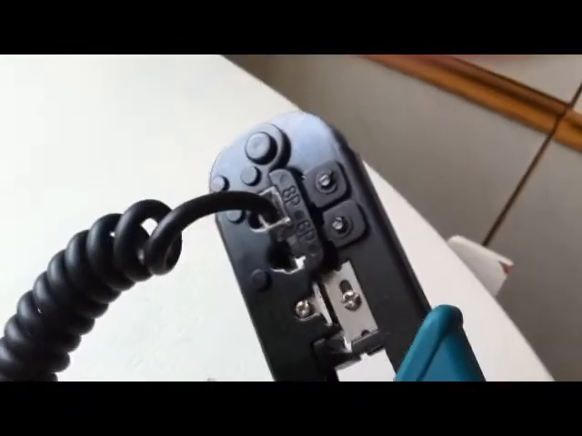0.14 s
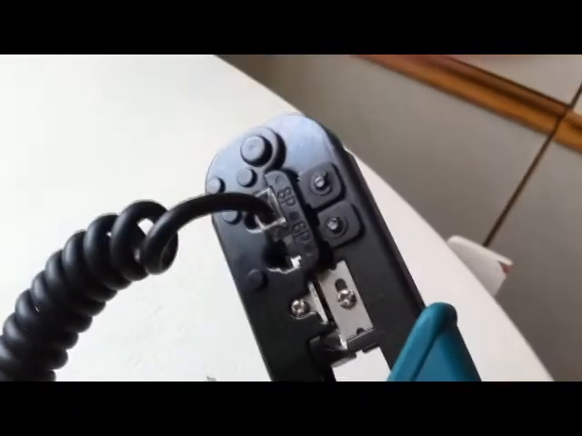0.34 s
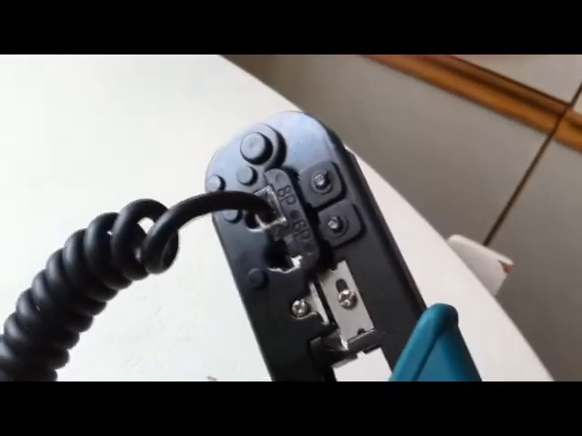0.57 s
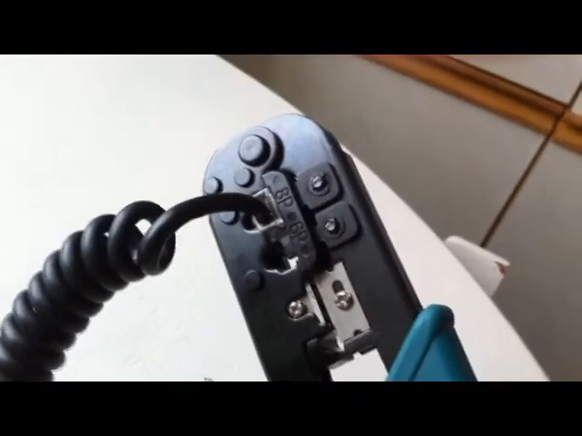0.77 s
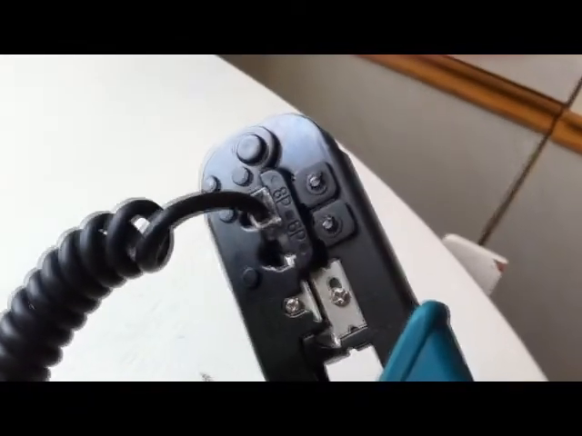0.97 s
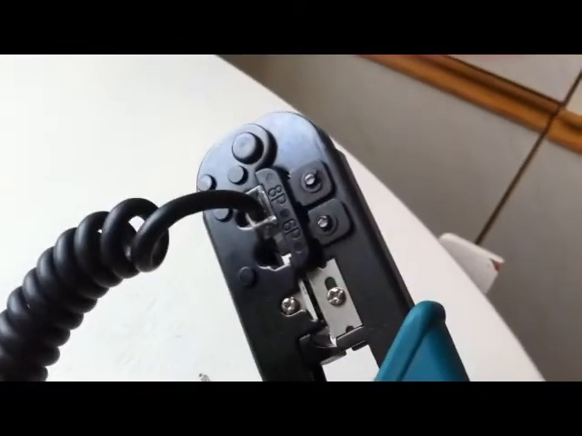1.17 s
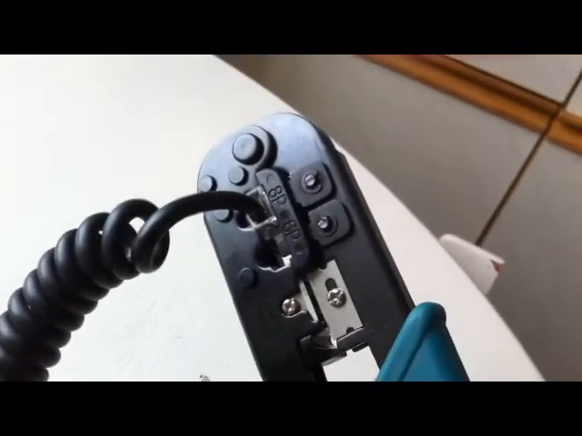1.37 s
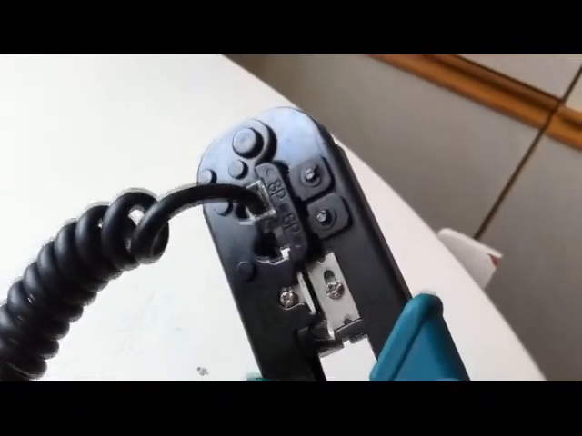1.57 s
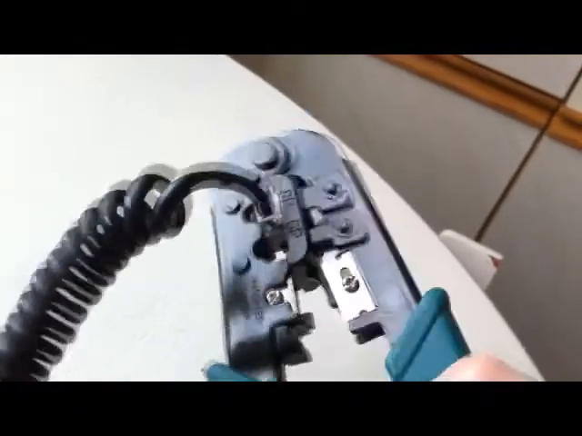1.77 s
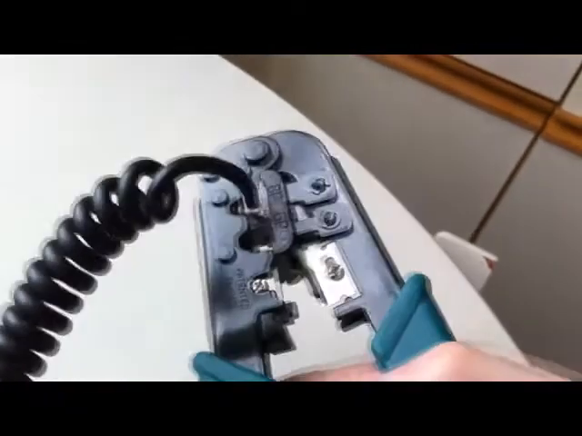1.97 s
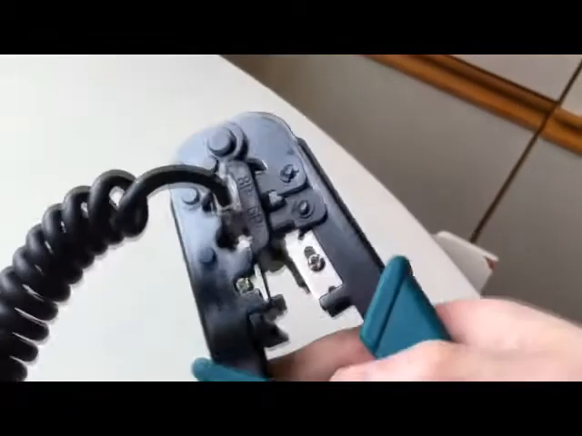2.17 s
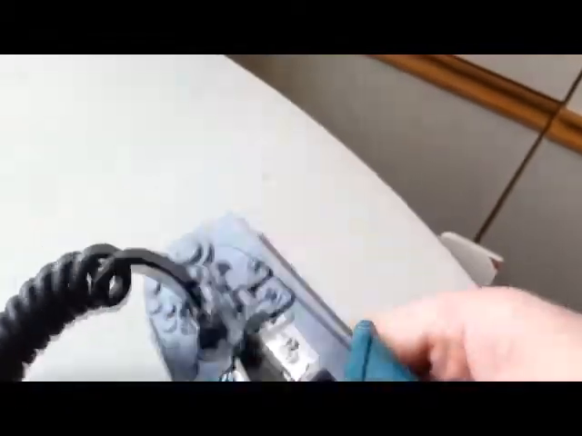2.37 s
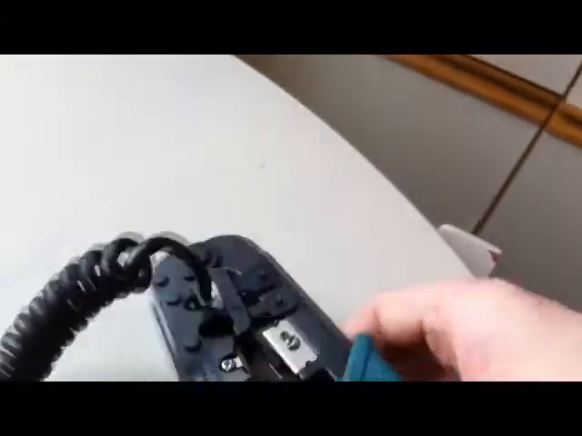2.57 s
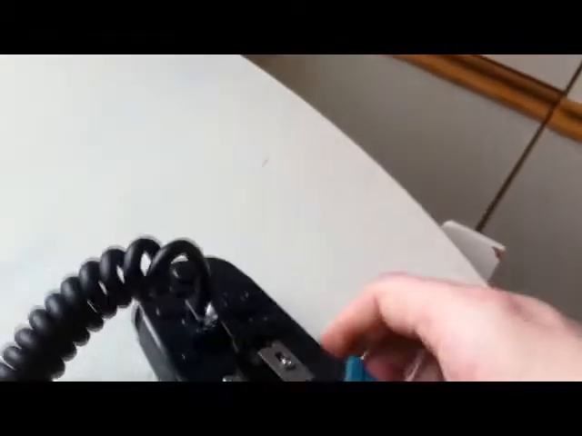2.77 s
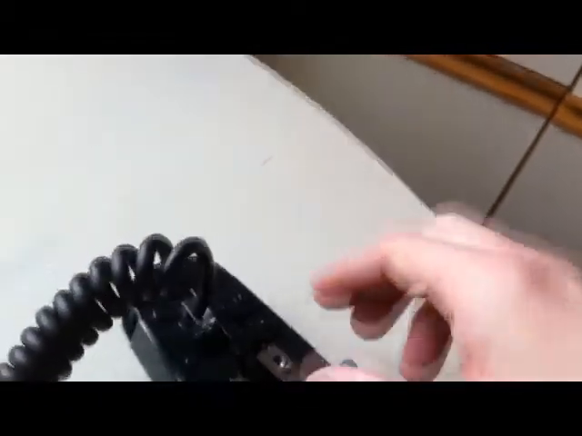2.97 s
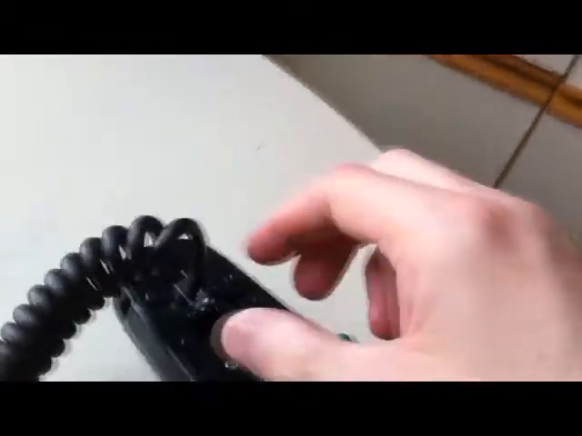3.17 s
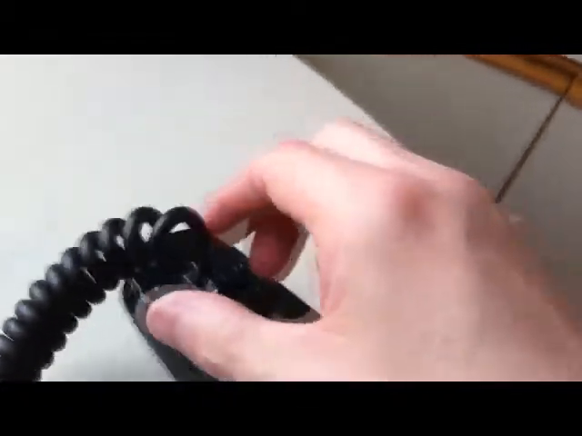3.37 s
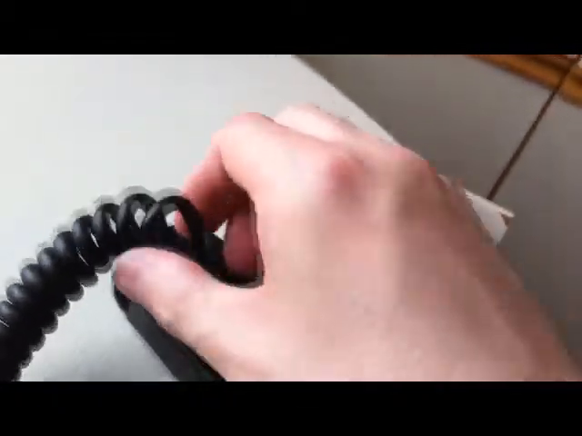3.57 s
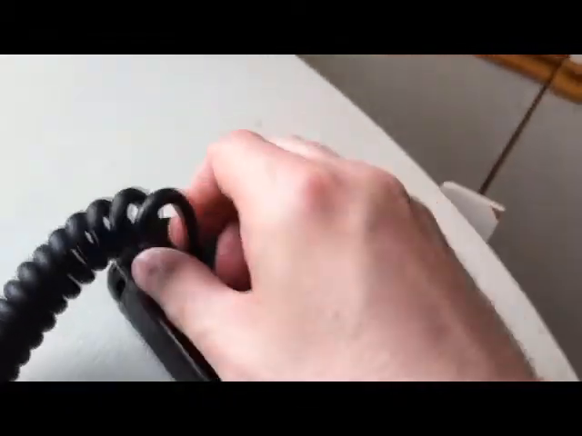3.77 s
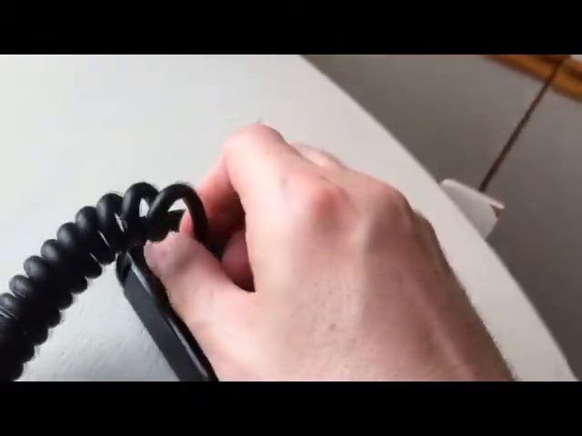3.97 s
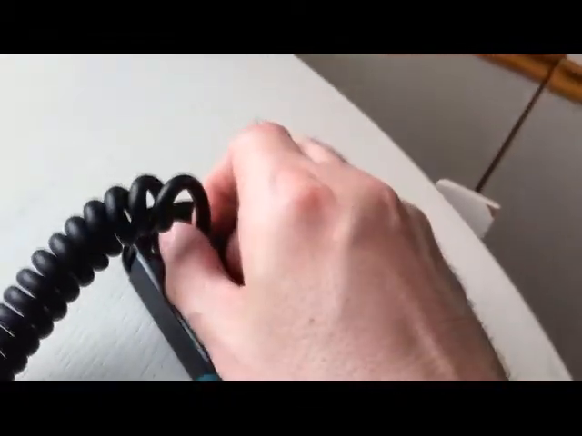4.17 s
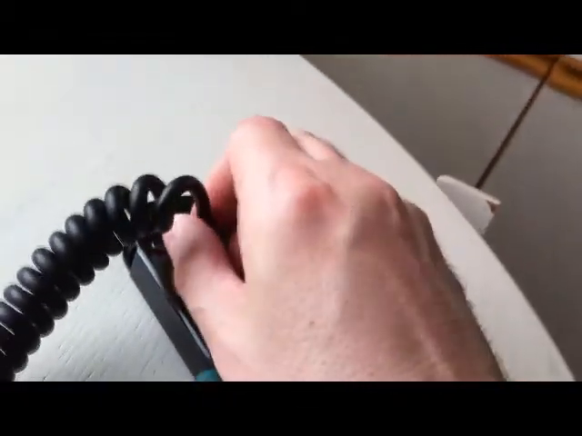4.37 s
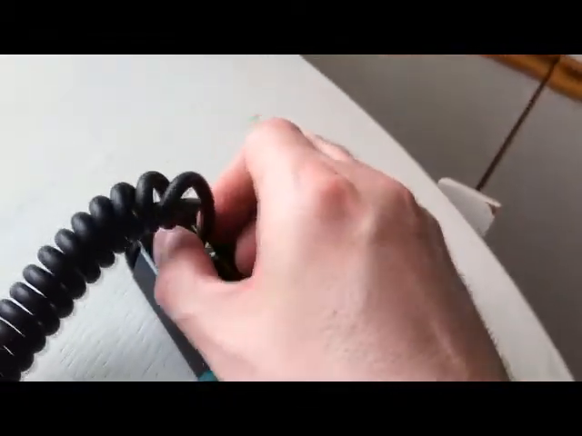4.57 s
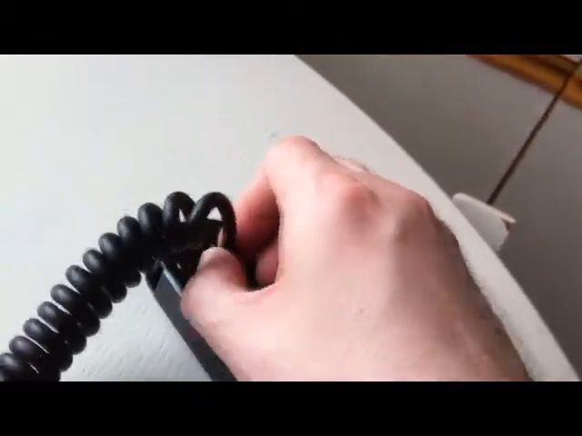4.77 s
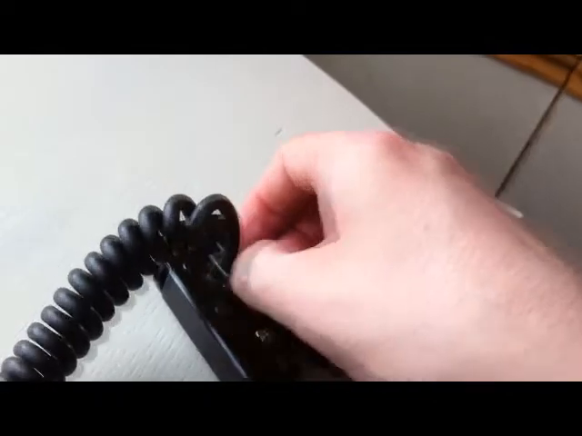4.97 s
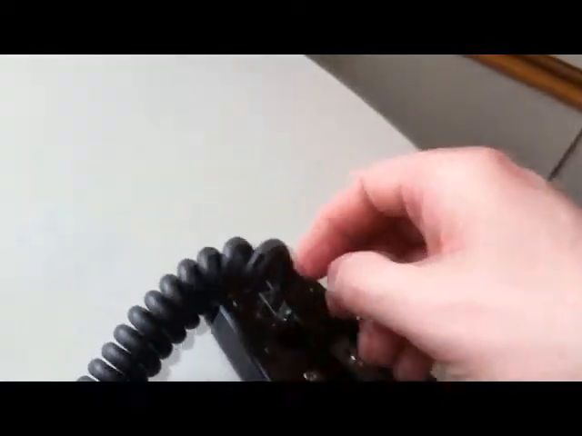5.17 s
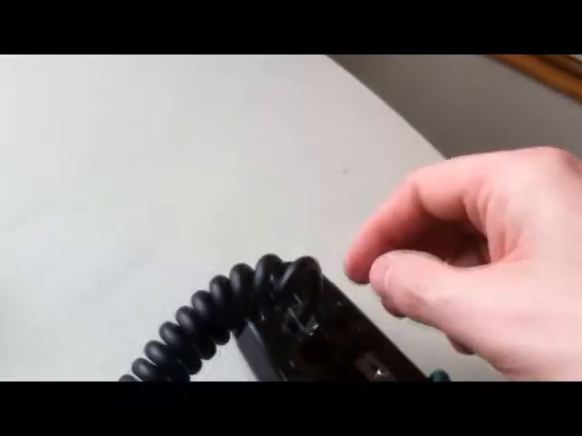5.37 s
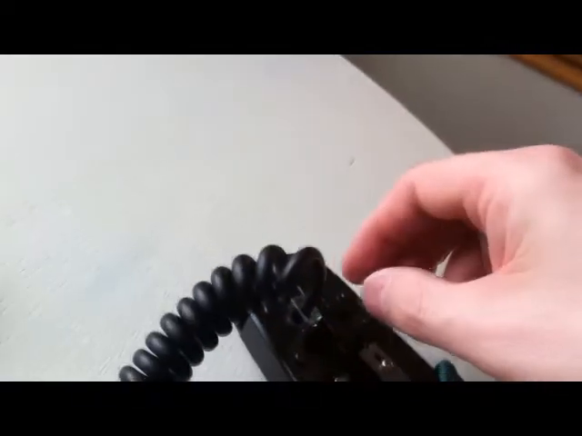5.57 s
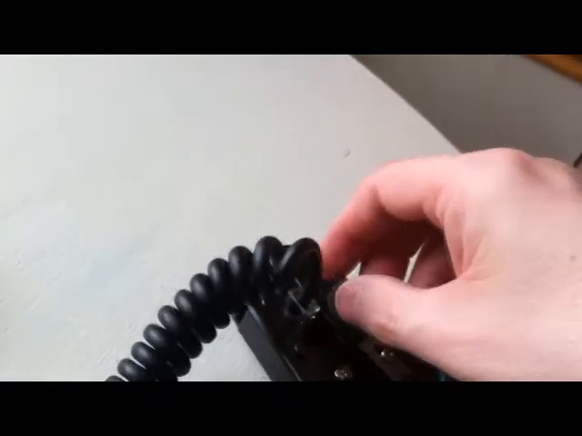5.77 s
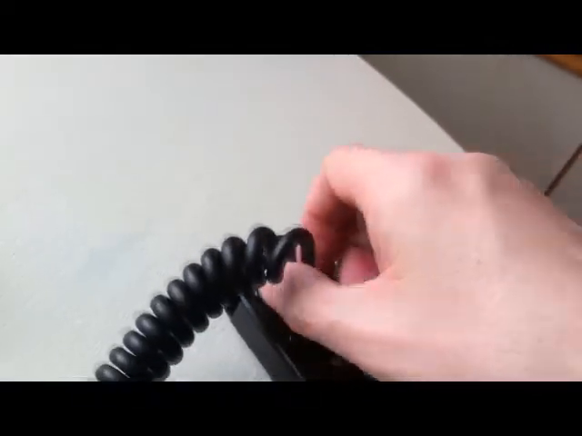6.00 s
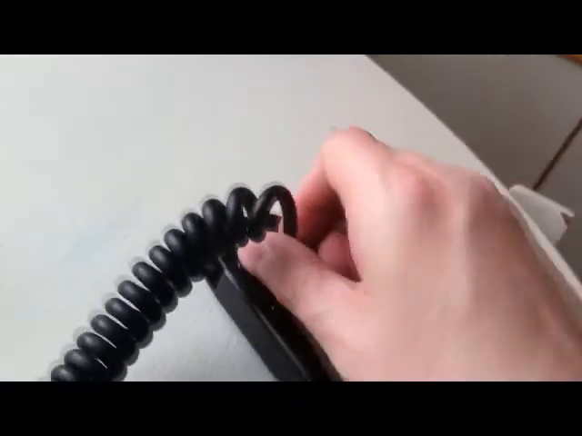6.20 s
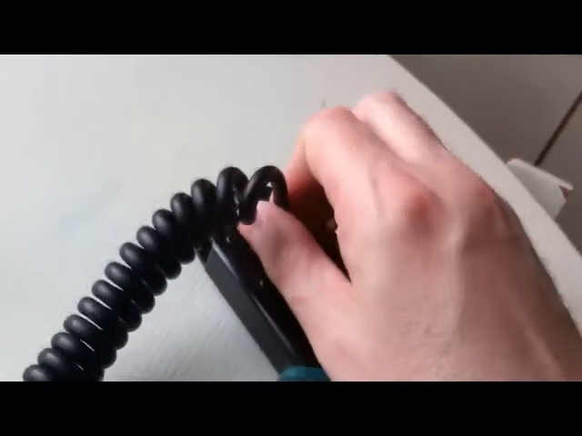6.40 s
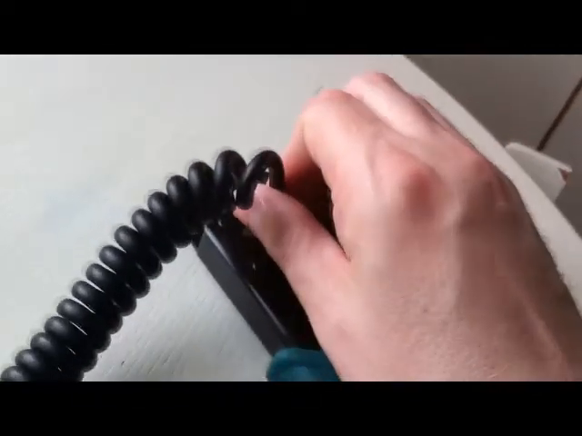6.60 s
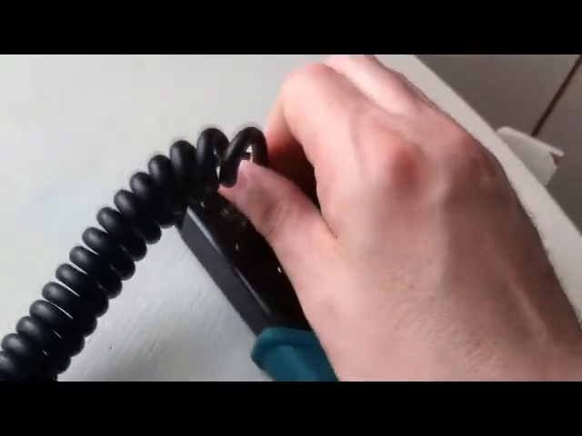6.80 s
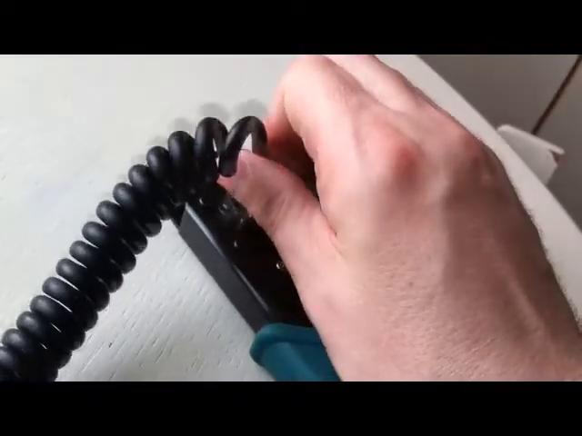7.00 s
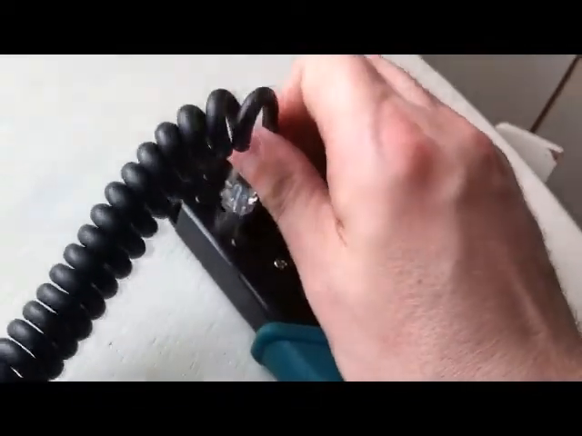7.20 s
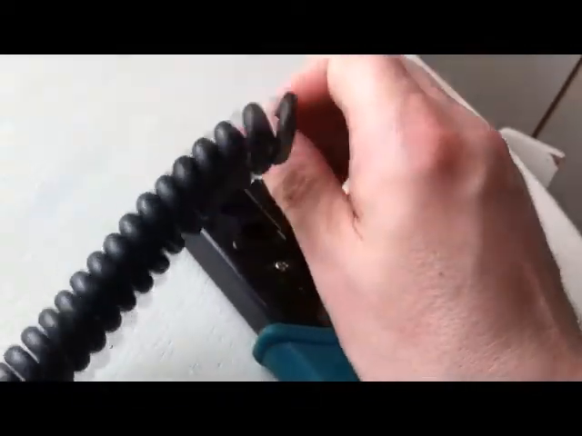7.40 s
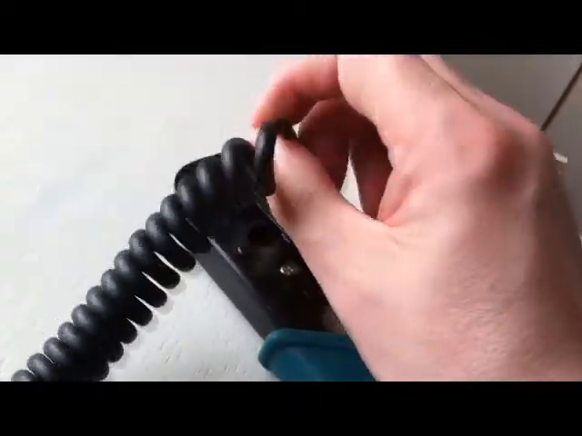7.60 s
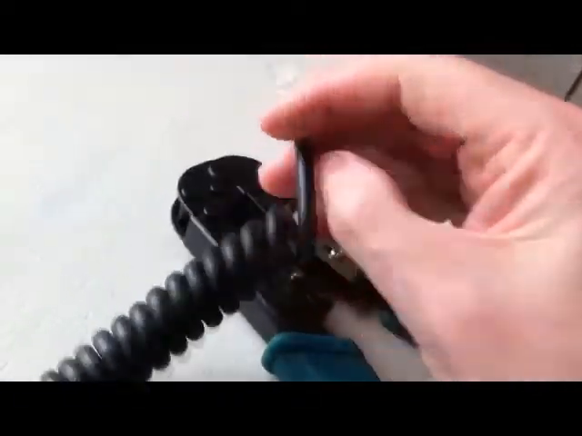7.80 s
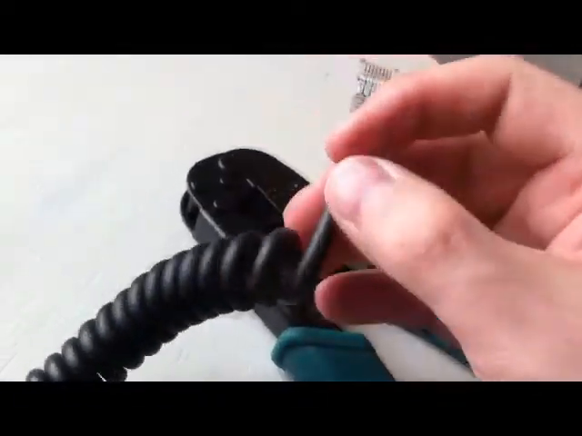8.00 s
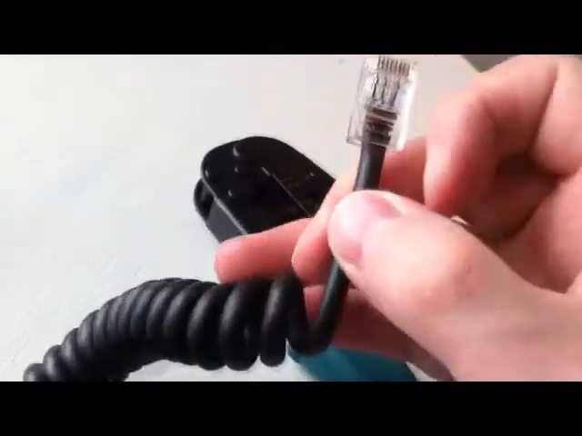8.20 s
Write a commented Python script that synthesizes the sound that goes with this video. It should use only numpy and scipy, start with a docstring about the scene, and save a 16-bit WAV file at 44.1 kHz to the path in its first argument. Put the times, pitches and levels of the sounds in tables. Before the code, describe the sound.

Quiet hissy room, then sharp clacks and hollow wooden thuds of a small steel tool set on a table, with faint rubbing and fiddling clicks.

```python
"""Low household rumble and microphone hiss run throughout. A steel crimping tool with plastic grips is
let go with faint ticks, laid on a hollow table top with hard knocks, and a plug is worked out of its jaw.
Each knock rings resonators for boards and tool frame and adds two short bursts of band noise, the crack.
Grips and fingers rub and the tool shuffles, as shaped noise; a small hard room answers with decaying noise."""
import sys
import numpy as np
from scipy import signal
from scipy.fft import rfft, irfft
from scipy.io import wavfile

SR = 44100
rng = np.random.default_rng(int(sys.argv[2]) if len(sys.argv) > 2 else 0)


def master(y):
    """Save y as 16-bit WAV."""
    cut = np.clip(np.atleast_2d(y).T, -1, 1)
    pcm = np.round(cut * 32767)  # scale
    wavfile.write(sys.argv[1], SR, pcm.astype(np.int16))


N = 363825  # samples


def from_db(db):
    """Decibel law: 20 dB is a factor of ten in amplitude."""
    return 10 ** (np.asarray(db) / 20)


def rms_one(x):
    """Normalisation to unit effective value."""
    return x / np.sqrt(np.mean(x ** 2) + 1e-20)


def at_hz(points, hz, column=1):
    """Interpolation of a table column along logarithmic frequency."""
    rows = np.array(points)
    return np.interp(np.log(hz), np.log(rows[:, 0]), rows[:, column])


def filtered(x, order, hz, kind="low"):
    """Butterworth filtering: a maximally flat pass band."""
    return signal.sosfilt(signal.butter(order, hz, kind, fs=SR, output="sos"), x)


def drift(corner_hz):
    """Slow random modulation: noise passed twice through a one-pole low-pass, unit spread."""
    step = 40  # samples between computed values
    pole = np.exp(-2 * np.pi * corner_hz * step / SR)
    noise = rng.standard_normal(N // step + 2002)
    slow = signal.lfilter([1], [1, -2 * pole, pole * pole], noise)[2000:]  # drop the filter's start-up
    return np.interp(np.arange(N) / step, np.arange(len(slow)), rms_one(slow))


def coloured(x, spectrum):
    """Spectral shaping: each frequency is weighted by the table, then the whole is set to rms 1."""
    hz = np.maximum(np.fft.rfftfreq(len(x), 1 / SR), 1)
    weight = from_db(at_hz(spectrum, hz))
    return rms_one(irfft(rfft(x) * weight, len(x)))


# Spectrum of the rumble and hiss. Each row: frequency in Hz, relative level in dB per Hz.
BACKGROUND_SPECTRUM = [(15, -58.5), (25, -38), (70, -43), (84, -11), (130, -6.5), (299, -2.5), (324, -9.5),
                       (382, -6.5), (729, -15), (929, -13), (4330, -18), (13400, -20.5), (15800, -14.5)]


def background():
    """Stationary noise: steady hiss, with the rumble under it slowly modulated in amplitude."""
    noise = coloured(rng.standard_normal(N), BACKGROUND_SPECTRUM)
    rumble = filtered(noise, 2, 500)
    rumble_change = from_db(1.5 * drift(corner_hz=0.89)) - 1
    return from_db(-63.5) * (noise + rumble_change * rumble)


# Reverberation by band. Each row: frequency in Hz, level in dB, 60 dB decay time in seconds.
ROOM_BANDS = [(100, -22, 0.17), (260, 2, 0.45), (675, 1, 0.31), (1800, -8.5, 0.46), (2410, -6.5, 0.55),
              (3220, -9, 0.3), (5000, -2, 0.23), (12000, -23, 0.1258)]


def room(x):
    """Diffuse reverberation: dense reflections build after a gap and decay exponentially in each band."""
    gap_s = 0.0027
    t = np.arange(SR * 3 // 4) / SR
    edges_hz = 70 * 2 ** np.arange(0, 8.1, .5)  # half octaves
    white = rng.standard_normal((2, len(t)))  # neighbouring bands use different noise
    answer = np.zeros(len(t))
    for k, (low, high) in enumerate(zip(edges_hz, edges_hz[1:])):
        centre_hz = np.sqrt(low * high)
        band = filtered(white[k % 2], 2, [low, high], "band")
        t60 = at_hz(ROOM_BANDS, centre_hz, column=2)
        answer += band * from_db(at_hz(ROOM_BANDS, centre_hz) - 60 * t / t60)
    build_up = np.clip(t / gap_s - .5, 0, 1)  # from half the gap to one and a half
    answer = answer * build_up / np.sqrt(SR / 40)
    return signal.fftconvolve(x, answer)[:N]


# The tool shuffling on the table under the hand. Each row: start in seconds, length in seconds, level in dB.
SHUFFLE_EVENTS = [(4.592, 0.68, -68), (6.15, .19, -70), (6.589, 0.19, -75.5), (7.494, 0.18, -68)]
# Spectrum of that friction. Each row: frequency in Hz, relative level in dB per Hz.
SHUFFLE_SPECTRUM = [(88, -33), (150, -3.5), (377, -5), (623, -24), (701, -28), (1430, -16), (1630, -20),
                    (3500, -25), (4550, -40), (7700, -120)]


def shuffles():
    """Structure-borne friction: soft noise carried by the table top, in lumps."""
    edge_s = 0.029  # rise and fall time
    t, level = np.arange(N) / SR, np.zeros(N)
    for start_s, length_s, level_db in SHUFFLE_EVENTS:
        inside_s = np.minimum(t - start_s, start_s + length_s - t)
        level += from_db(level_db) * np.clip(inside_s / edge_s, 0, 1)
    lumps = from_db(3.7 * drift(corner_hz=16.5))
    return level * lumps * coloured(rng.standard_normal(N), SHUFFLE_SPECTRUM)


# Grips and fingers sliding. Each row: loudest moment in seconds, peak level in dB, swell in seconds,
# fade in seconds, treble edge in dB above that level.
RUB_EVENTS = [(1.876, -63.5, 0.13, .03, -9), (1.898, -49, 0.011, .04, 7), (1.945, -48.5, 0.045, 0.052, 1.5),
              (2.175, -57.5, 0.085, 0.065, -5), (2.332, -63, .01, 0.089, -5.5),
              (2.46, -53.5, 0.089, 0.043, -2.5), (2.54, -49, 0.11, 0.033, -4),
              (2.596, -48.5, 0.012, .025, -18), (2.66, -62.5, .02, 0.26, -16.5),
              (2.757, -61.5, .2, 0.061, -6.5), (3.062, -44, 0.03, 0.05, -4.5),
              (3.179, -57.5, 0.1, 0.026, 2), (4.87, -65, 0.23, 0.098, -1), (6.39, -62, 0.03, 0.082, -15),
              (6.43, -71, .04, .06, -17.5), (6.503, -61, 0.097, 0.16, -5.5),
              (6.845, -64, 0.011, 0.14, -17.5), (7.214, -66.5, .01, .15, 3),
              (7.433, -70.5, 0.0095, .09, -21.5), (7.579, -65.5, 0.015, 0.063, 1)]
# Spectrum of the rubbing. Each row: frequency in Hz, relative level in dB per Hz.
RUB_SPECTRUM = [(410, -38.5), (700, -13), (1280, -5.5), (1430, -14.5), (3460, -6), (4440, -2.5), (5380, -8),
                (7910, -0.5), (10500, -9), (13600, -40), (22000, -120)]


def rubs():
    """Stick-slip friction: dense tiny slips of uneven size; a dry fast slide has more treble edge."""
    slips_per_s, range_db = 2000, 20  # range: the change over one swell or fade time
    t, level, edge_level = np.arange(N) / SR, np.zeros(N), np.zeros(N)
    for peak_s, peak_db, swell_s, fade_s, edge_db in RUB_EVENTS:
        before = (peak_s - t) / max(swell_s, .002)
        after = (t - peak_s) / max(fade_s, .002)
        away = np.maximum(before, after)
        swell = from_db(peak_db - range_db * np.minimum(away, 10))
        level += swell
        edge_level += swell * from_db(edge_db)
    sizes = from_db(3.5 * np.minimum(rng.exponential(1, N), 4))
    sizes = sizes * rng.choice([-1, 1], N)
    happens = rng.random(N) < slips_per_s / SR
    slips = happens * sizes + 0.3 * rng.standard_normal(N)
    edge = rms_one(filtered(slips, 2, 11000, "high"))
    uneven = from_db(2.0 * drift(corner_hz=44))
    return uneven * (level * coloured(slips, RUB_SPECTRUM) + edge_level * edge)


def struck(at_s, modes, level_db, chatter_s, fade_db):
    """Modal excitation: each knock sends four quick contacts, on average weaker, into damped resonators."""
    spread_db, contact = 1.8, np.arange(4)
    luck = rng.standard_normal((len(at_s), len(modes), 3, 4))  # strength, moment, sign of each contact
    luck[:, :, 0] -= luck[:, :, 0].mean(axis=1, keepdims=True)  # mean change over the modes is 0 dB
    out = np.zeros(N)
    for k, (hz, mode_db, t60) in enumerate(modes):
        strength, moment, sign = luck[:, k, 0], np.abs(luck[:, k, 1]), np.sign(luck[:, k, 2])
        size = from_db(level_db[:, None] + mode_db + spread_db * strength - fade_db * contact)
        when_s = at_s[:, None] + chatter_s * moment * (contact + .15)
        clicks = np.full(N, 1e-18)
        np.add.at(clicks, np.minimum(when_s * SR, N - 1).astype(int), size * sign)
        radius = from_db(-60 / (t60 * SR))
        angle = 2 * np.pi * hz / SR
        resonator = [1, -2 * radius * np.cos(angle), radius * radius]
        out += signal.lfilter([0, np.sin(angle)], resonator, clicks)
    return out


def cracked(at_s, level_db, low_hz, high_hz, t60):
    """Broadband impact noise: band noise under an envelope that jumps at each knock and decays."""
    jumps = np.full(N, 1e-18)
    jumps[(at_s * SR).astype(int)] = from_db(level_db)
    envelope = signal.lfilter([1], [1, -from_db(-60 / (t60 * SR))], jumps)
    return filtered(envelope * rng.standard_normal(N), 3, [low_hz, high_hz], "band")


# Knocks and ticks. Each row: start in seconds, then strengths in dB of frame, table, crack and top crack.
KNOCK_EVENTS = [(1.831, -73, -65, -52, -54), (1.8528, -72, -70, -57, -49), (1.864, -72, -74, -46, -51),
                (1.8817, -73, -68, -36, -40), (1.889, -73, -87, -38, -43), (1.8946, -56, -95, -31, -24),
                (1.9482, -73, -80, -28.5, -24.5), (2.2839, -21, -30, -28, -23),
                (2.2866, -17.5, -41, -27, -24.5), (2.5382, -41, -45.5, -34, -49),
                (2.5763, -30.5, -27.5, -18.5, -26), (2.5848, -37, -30, -33.5, -35),
                (2.6265, -17.5, -34, -32, -33.5), (2.6308, -19.5, -39.5, -31.5, -25),
                (2.6579, -33.5, -31, -41, -54), (2.8535, -34, -27.5, -35, -49),
                (2.88, -44, -31.5, -43, -48), (2.9455, -60, -27.5, -42.5, -65),
                (3.005, -42, -26.5, -47, -49), (3.0177, -13.5, -43, -12, -24.5),
                (3.0353, -15.5, -19, -15.5, -26), (3.054, -18, -23, -18.5, -44),
                (3.1833, -46, -52, -32, -39.5), (3.617, -24, -26.5, -29, -36),
                (3.8705, -62, -50.5, -54, -54), (3.9693, -29, -38, -48, -53),
                (3.9747, -49, -29.5, -33, -41.5), (4.0785, -25.5, -30, -25.5, -43),
                (4.0877, -26, -30.5, -50, -35), (4.096, -40, -30.5, -34.5, -40),
                (4.1064, -52, -25, -34, -47), (4.3227, -24, -29.5, -46, -46),
                (4.3882, -31, -30.5, -51, -49.5), (4.868, -59, -59, -67.5, -64.5),
                (5.1234, -64, -49, -68, -64), (5.194, -36, -38, -44.5, -50.5),
                (6.2412, -57.5, -54, -64, -66), (6.2877, -59.5, -40, -54, -57),
                (6.3554, -25, -31, -32.5, -29), (6.3686, -26, -36, -36, -34), (6.4347, -58, -44, -34, -42),
                (6.4601, -28, -36.5, -57, -63), (6.6398, -59, -49.5, -52, -49),
                (6.6707, -57, -49.5, -68, -51), (6.732, -57.5, -56, -42.5, -41),
                (6.8213, -48.5, -37, -28.5, -32), (6.9863, -55.5, -36, -42, -46),
                (7.195, -43.5, -35.5, -41.5, -34), (7.4179, -55.5, -68.5, -32, -37),
                (7.5518, -61, -61, -45, -54), (7.5594, -42, -74, -37.5, -50.5),
                (7.7086, -78, -72.5, -48.5, -53.5), (7.739, -69.5, -77, -54.5, -46.5),
                (7.7561, -69.5, -71.5, -65.5, -46), (7.9138, -87, -68.5, -32.5, -47),
                (7.9556, -55.5, -60.5, -41, -52), (8.025, -31, -54, -22.5, -34.5),
                (8.2373, -52, -59, -37, -54)]
# The tool is moved about, so the deep boards answer more or less.
# Each row: time in seconds, strength in dB above the table top.
BOARD_SHARE_OVER_TIME = [(2.3, -1.5), (2.6, 2), (2.9, -4.5), (3.04, -8.5), (3.6, -8), (4.4, -17.5),
                         (5.2, -12), (6.2, -1.5), (7.2, 9)]
# Modes of the deep boards, table top, lower frame, frame and jaws.
# Each row: frequency in Hz, level in dB, 60 dB decay time in seconds.
BOARD_MODES = [(144.3, -13, 0.3), (174, -11.5, 0.025), (229, -4, 0.058), (270, 2.5, 0.06)]
TABLE_MODES = [(298.7, -5, 0.08), (304, -9.5, 0.0499), (356.7, -4, 0.1), (415, -7, 0.066)]
LOWER_FRAME_MODES = [(474, 0, 0.025), (522, -1, 0.035), (604, 1, 0.0087), (713.4, 2.5, 0.028),
                     (705, -2.5, 0.034), (873, -7, 0.028), (952, -3, 0.027), (1095, -6.5, 0.09),
                     (1143, -14.5, 0.0067)]
FRAME_MODES = [(1233, -2, .016), (1368, -1, .015), (1540, 0, .014), (1690, -1, .013)]
JAW_MODES = [(1890, 0, .013), (2040, -1, .012), (2320, -2, .011), (2560, -3, .01), (2950, -6, .009)]


def knocks():
    """Impact and radiation: a heavy table pushed softly gives no treble, a small tool radiates no bass."""
    at_s, frame_db, table_db, crack_db, top_db = np.transpose(KNOCK_EVENTS)
    boards_db = table_db + np.interp(at_s, *np.transpose(BOARD_SHARE_OVER_TIME))
    jaws_db = (frame_db + crack_db) / 2 - 2  # the jaws follow frame and crack
    lower_db = table_db + 0.45 * (frame_db - table_db) - 4  # the lower frame follows frame and table
    table = struck(at_s, BOARD_MODES, boards_db, chatter_s=0.0021, fade_db=6.5)
    table += struck(at_s, TABLE_MODES, table_db, chatter_s=0.0061, fade_db=8.0)
    table = filtered(table, 2, 600)
    frame = struck(at_s, LOWER_FRAME_MODES, lower_db, chatter_s=0.003, fade_db=4.5)
    frame += struck(at_s, FRAME_MODES, frame_db, chatter_s=0.0027, fade_db=3.0)
    frame += struck(at_s, JAW_MODES, jaws_db, chatter_s=0.002, fade_db=2.0)
    frame = filtered(frame, 2, [350, 4500], "band")
    crack = cracked(at_s, crack_db, low_hz=2900, high_hz=4700, t60=0.017)
    top_crack = cracked(at_s, top_db, low_hz=6000, high_hz=12000, t60=0.018)
    return table + frame + crack + top_crack


def scene():
    """Superposition: near sounds, losing their bass on the small microphone port, room and background."""
    near = filtered(knocks() + rubs() + shuffles(), 5, 108, "high")
    return (near + room(near) + background())[None]


def record(dry):
    """Band limiting: a steep low-pass cuts the top, 60 dB down from 15950 Hz."""
    return signal.sosfilt(signal.cheby2(14, 60, 15950, fs=SR, output="sos"), dry)


dry = scene()
out = record(dry)
master(out)
```